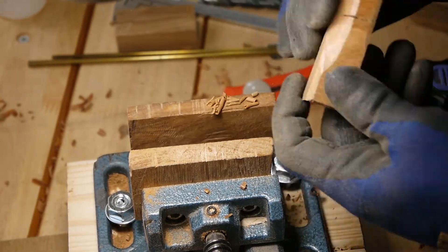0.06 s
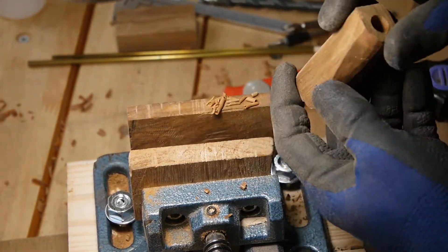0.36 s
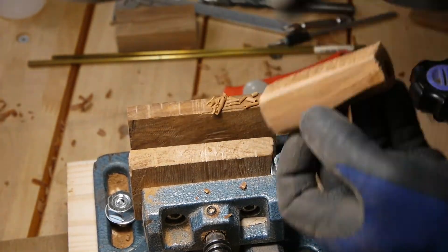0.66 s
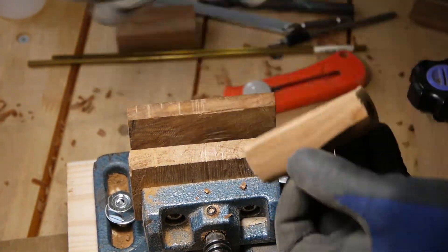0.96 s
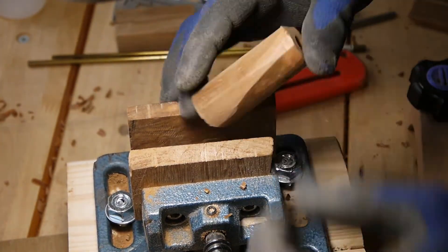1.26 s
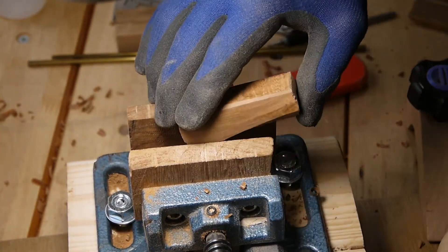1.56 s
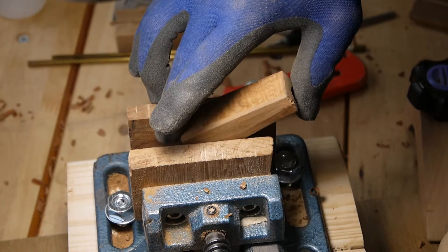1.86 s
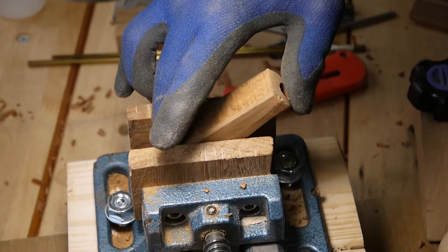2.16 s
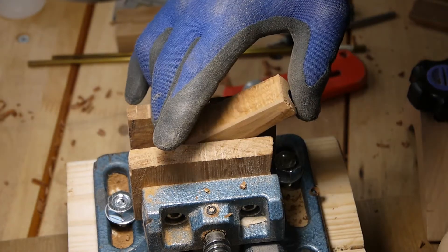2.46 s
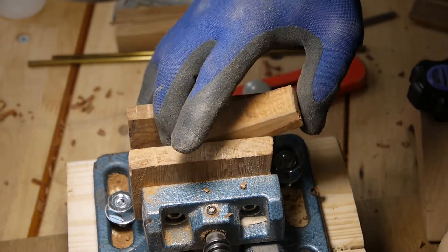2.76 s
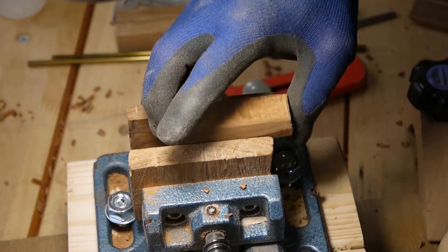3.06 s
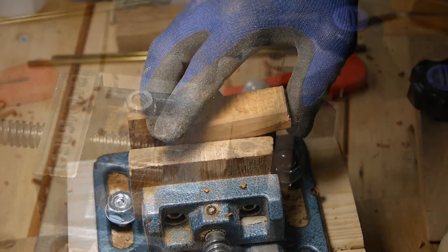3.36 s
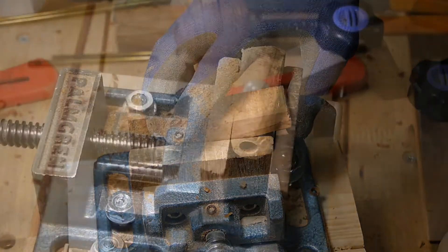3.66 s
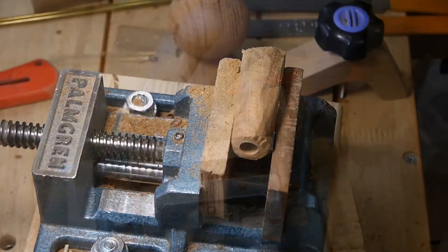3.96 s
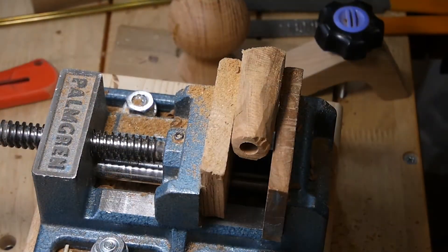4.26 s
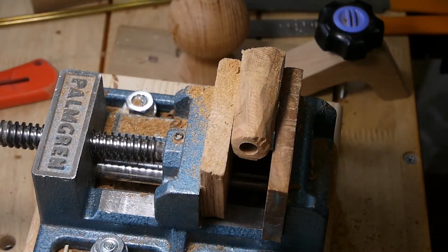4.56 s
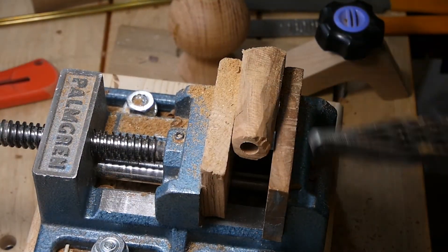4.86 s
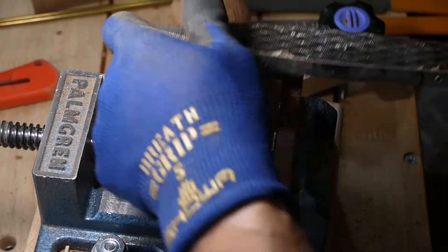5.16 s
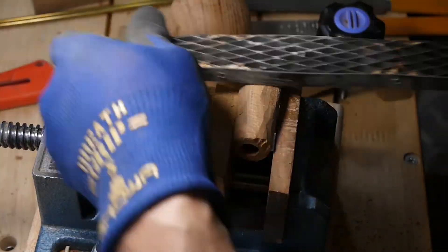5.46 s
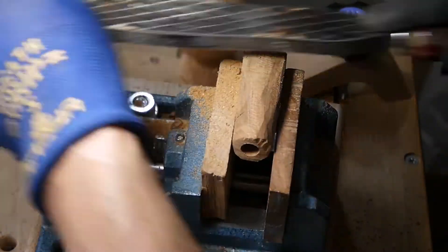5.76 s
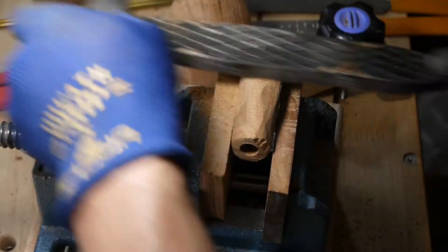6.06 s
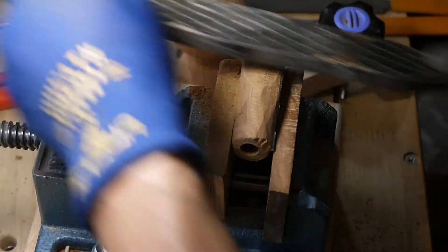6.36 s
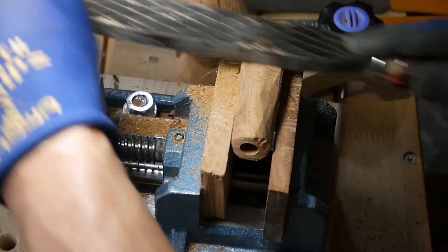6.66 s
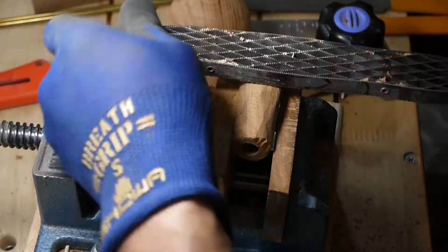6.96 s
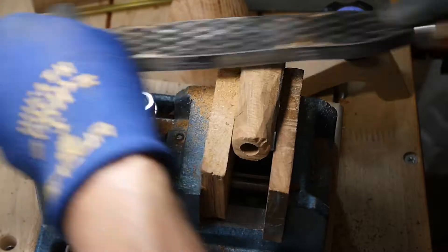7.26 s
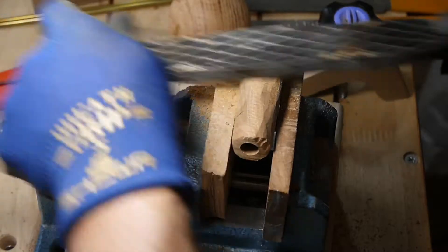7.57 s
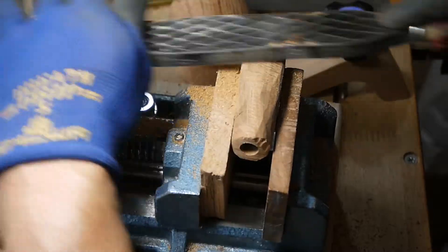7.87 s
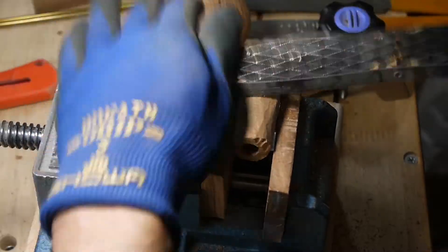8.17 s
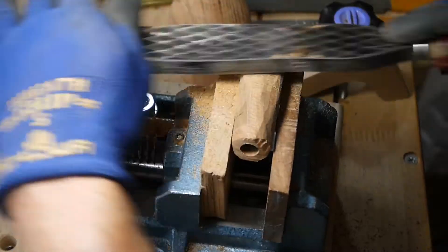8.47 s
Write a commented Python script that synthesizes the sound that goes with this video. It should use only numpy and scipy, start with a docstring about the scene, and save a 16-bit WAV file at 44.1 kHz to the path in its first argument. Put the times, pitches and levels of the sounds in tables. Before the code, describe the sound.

A faint machine hum and a thin, high electrical whine fill a small workshop, and everything is heard close up. At the start, gloves brush softly over a small hardwood block. From about 1 to 2 seconds the block touches the jaws of a steel vice with light clicks and tiny squeaks, and a busier cluster of clicks follows between 2.6 and 3.6 seconds. From 3.8 to 5 seconds come a few dull bumps on the bench, the first with a low boom, among soft glove swishes. At 5.2 seconds a coarse rasp starts filing the clamped wood, much louder, at about five strokes a second. Each stroke lands with a knock, then gives a hollow, gritty scrape with a hiss of tearing fibres and a brief rough note from the blade. The teeth occasionally snag, with a short squeak near 7.9 seconds. The filing continues until the end, around 8.7 seconds.

```python
"""A faint hum and whine fill a workshop. Close up, gloves brush over a small hardwood block and seat it
in a steel vice with light clicks and squeaks. A few dull bumps on the bench follow. Then a coarse rasp
files the clamped wood, five strokes a second: each stroke lands with a knock, tears through the fibres
while the blade sings, and glides back."""
import sys
import numpy as np
from scipy import signal
from scipy.fft import rfft, irfft, next_fast_len
from scipy.io import wavfile
from scipy.ndimage import map_coordinates

SR = 44100
rng = np.random.default_rng(int(sys.argv[2]) if len(sys.argv) > 2 else 0)


def digitize_waveform(pressure):
    """Quantize a signal to 16-bit integers and store it at the path in sys.argv[1].

    Rows of a 2-D input are taken as channels; values are limited to [-1, 1].
    """
    field = np.atleast_2d(pressure).T
    bounded = np.clip(field, -1, 1)
    quanta = np.round(bounded * 32767).astype(np.int16)
    wavfile.write(sys.argv[1], SR, quanta)


N = 383669
SIZE, TOP_HZ = 16384, 15800  # samples in one sound's window; band limit of the mix
T, HZ = np.arange(SIZE) / SR, np.fft.rfftfreq(SIZE, 1 / SR)
MID_S = T[SIZE // 2]  # swells peak here

# room tone colour (frequency [Hz], level [dB])
AIR_BED = [(15, -34), (40, -14), (100, -25.5), (170, -8), (400, -2.5), (600, -5), (1100, -2), (1300, -7),
           (2600, -17.5), (3800, -26), (6500, -30), (10400, -27.5), (12500, -29), (16000, -28)]
# room tone fader (time [s], level [dB])
AIR_LEVEL = [(0.0, -50), (2.56, -52.5), (2.81, -48.5), (3.46, -53.5), (3.82, -52), (3.97, -49.5),
             (4.88, -50.5), (5.2, -49.5)]
# a machine's hum, low drone and electrical whine (frequency [Hz], width [Hz], level [dB])
HUM_MODES = [(608, 9, 12), (854, 11, 6.5), (1101, 17, 3), (1900, 21, -27), (2380, 65, -14.5)]
DRONE_MODES = [(209.7, 2.8, 0)]
WHINE_MODES = [(7640, 51, -14), (8200, 210, -13), (9600, 49, -8), (10370, 550, -10), (10300, 88, -4.5)]
# machine faders (time [s], drone [dB], whine [dB])
MACHINE_LEVEL = [(0, -58, -63.5), (.7, -66, -65.5), (1.1, -72, -68), (3.5, -74, -69), (4, -64.5, -62),
                 (5.199, -65, -61)]
# a motor's steady tones (frequency [Hz], level [dB])
MOTOR_TONES = [(597.5, -58.5), (1087, -60), (10293, -86)]
# gloves brush wood and tools (time [s], half-length [s], level [dB], brightness [dB])
RUBS = [(0.028, 0.039, -41, 13), (0.815, 0.018, -54.5, 29), (0.951, 0.014, -49, 18), (2.594, .01, -51, 1),
        (2.843, .012, -50, -10), (2.878, 0.0052, -49, 11), (3.666, 0.034, -57, 15), (4.065, 0.058, -47, -1),
        (4.219, 0.088, -48.5, -9), (4.394, 0.11, -55, 10), (4.507, 0.018, -53, 12),
        (4.699, 0.029, -41.5, 26), (4.844, 0.03, -49.5, 10), (5.096, 0.031, -46.5, 27)]
# glove colour (frequency [Hz], level [dB])
GLOVE_COLOUR = [(59, -67), (100, -40), (335, -1.5), (836, 6), (1080, -11), (1170, 2), (2040, -3.5),
                (2690, -9), (3620, -14.5), (16000, -27)]
# the block touches the jaws (time [s], level [dB], brightness [dB])
TAPS = [(.945, -43, 13), (1.433, -37, -1), (1.61, -37.5, -40), (1.68, -31, -4), (1.787, -44.5, 10),
        (1.835, -35, -17), (2.124, -31.5, -4), (2.609, -23, 4), (2.638, -33, 6), (2.693, -25.5, 18),
        (2.705, -22, -10), (2.72, -27.5, -21), (2.739, -33.5, 11), (2.783, -37.5, -1), (2.883, -23.5, -9),
        (2.941, -29.5, -18), (3.004, -36, -5), (3.235, -32.5, -3), (3.252, -27.5, -5), (3.55, -37, 1)]
# wood sticks and slips (time [s], half-length [s], pitch [Hz], width [Hz], level [dB])
SQUEAKS = [(.95, .012, 3000, 650, -54), (1.443, 0.014, 2520, 510, -46), (1.686, 0.014, 1946, 130, -43.5),
           (4.175, 0.1, 330, 29.7, -49), (5.103, 0.026, 320, 57, -42), (7.889, 0.013, 1972, 86, -19),
           (8.545, 0.012, 486, 19.6, -29.5)]
# bumps on the bench (time [s], level [dB], brightness [dB], boom [dB])
BUMPS = [(3.799, -12, 5, 6), (3.816, -16, -2, 17), (3.858, -21.5, 8.5, 2), (3.905, -28.5, -16, -24),
         (3.949, -18.5, -20.5, -14), (4.023, -31, 3, -4), (4.359, -23, 9, 5), (4.503, -32, -32, -13),
         (4.673, -14, -13.5, -13), (5.04, -21.5, 2, -7), (5.051, -15.5, -0.5, -20)]
# resonances of the block, the bench and the steel teeth (frequency [Hz], width [Hz], level [dB])
BLOCK_MODES = [(461, 18, 10), (555, 48, 1.5), (686, 99, 2.5), (884, 31, 5.5), (1015, 9.3, 5),
               (1400, 21, -16), (1940, 70, -2.5), (2270, 34, -5), (3320, 70, -14), (3520, 98, -18),
               (3950, 110, -23), (4880, 80, -26), (6420, 120, -19.5), (7350, 320, -26)]
BENCH_MODES = [(244, 30, 2), (468, 11, -16), (600.0, 16, 6.0), (1162, 18, -2), (1450, 46, -27),
               (1710, 52, -11), (2185, 17, -9.0), (4500, 400, -25.5), (5000, 300, -28)]
STEEL_MODES = [(4560, 54, 5.6), (5330, 130, 2.1), (6350, 31, 4.7), (6850, 110, 2.2), (8300, 110, 2),
               (9520, 290, 8.8), (9700, 220, 5.2), (10310, 150, 8.4), (11070, 120, 4.1), (11230, 120, 1.7),
               (13400, 120, 4.2), (15400, 130, 5), (15500, 110, 4.8)]
# resonances of clamped wood and vice (frequency [Hz], width [Hz], scraped [dB], knocked [dB])
CLAMPED_MODES = [(160, 11, -20.5, -29), (246.5, 31, -18.5, -8.5), (339, 55, -20.5, -10),
                 (463, 20, -3.5, 4.5), (550, 35, -10.5, 3.5), (682, 36.7, -6.5, 7.5), (798, 33, -8.5, -1),
                 (849, 39, -13, 0.5), (1013, 62, -11, -8.5), (1182, 44.4, -4, 0), (1391, 51, -11, -15),
                 (1574, 43, -12, -19.5), (1768, 38, -9, -13), (1890, 24.5, -3.5, 0.5),
                 (1968, 37, -12.5, -2), (2095, 35, -9.5, -5), (2285, 47, -8, -3.5), (2520, 95, -15.5, -15),
                 (2940, 25, -19.5, -14), (3146, 42, -19, -25), (3530, 52, -21.5, -32),
                 (3634, 38, -21.5, -28)]
# dense weak modes of block, bench, and clamped wood knocked or scraped (frequency [Hz], level [dB])
BLOCK_BED = [(60, -50), (330, -17), (450, -15), (1000, 0.5), (1300, -7), (2200, -11), (2800, -17),
             (5500, -27.5), (12000, -30.5), (16000, -51)]
BENCH_BED = [(30, -50), (85, -48), (140, -7), (350, -1.5), (650, 0), (1100, -5), (2000, -15), (3400, -29.5),
             (5000, -41), (7000, -35), (10000, -35), (16000, -40)]
KNOCK_BED = [(30, -50), (90, -56), (145, -12), (400, -27.5), (900, -12), (1500, -13.5), (2400, -12.5),
             (3800, -30.5), (7500, -38), (9700, -35), (13000, -41.5), (16000, -43)]
SCRAPE_BED = [(30, -33.5), (90, -56), (135, -18.5), (400, -25.5), (1500, -21), (2200, -47), (2800, -39),
              (4000, -35.5), (6000, -38), (16000, -61)]
# hiss of tearing fibres (frequency [Hz], level [dB])
FIBRE_BED = [(1500, -60), (2800, 2), (4200, -4.5), (5000, -11), (7500, -3), (8400, 0), (10800, 3),
             (11100, -8), (11700, 4), (12500, -2.5), (14500, -1.5), (16000, 0.5)]
# the rasp lands, then is pushed (time [s], knock [dB], knock brightness [dB], rise to full speed [s],
# push length [s], push [dB], hollowness [dB], blade note [dB])
STROKES = [(5.22, -15.5, -10, 0.1, 0.058, -19.5, 2, -26.5), (5.486, -12, 3.5, 0.07, .052, -23.5, 1, -26.5),
           (5.664, -13, -19, 0.074, 0.054, -24, -0.5, -28),
           (5.872, -11.5, -3.5, .066, 0.05, -22, -2.5, -27),
           (6.061, -6.5, 0.5, .064, 0.052, -20.5, 4.5, -34),
           (6.251, -11.5, -22.5, 0.063, 0.052, -19.5, 6, -52),
           (6.443, -6.5, 1.5, 0.055, 0.046, -18, 6.5, -43),
           (6.623, -7.5, -11, 0.063, 0.051, -22, -1, -25.5),
           (6.812, -8.5, -12.5, 0.068, 0.052, -23, -2, -29), (7.003, -3.5, -3, 0.062, 0.052, -21.5, 3, -32),
           (7.185, -8, 11, 0.057, 0.053, -20.5, -5, -26), (7.354, -12.5, -5, 0.067, 0.051, -19, 5.5, -22.5),
           (7.551, -5.5, 9, 0.064, 0.047, -19, 2.5, -22.5), (7.799, -8.5, -9, .1, 0.05, -20, 5, -32),
           (8.009, -16, -6, .076, 0.057, -19.5, 4, -28.5),
           (8.211, -4.5, -3.5, 0.057, 0.053, -18.5, 3.5, -25.5),
           (8.388, -13.5, -18, 0.058, 0.053, -16.5, 7, -38), (8.573, -8.5, 0, .06, 0.053, -18, 0, -28)]
# the teeth bite in after the first strokes (time [s], fibre level [dB])
BITE = [(5.32, -32), (5.74, -32), (6.15, -23.5), (6.7, -26), (7.9, -27.5), (8.08, -28.5), (8.27, -26)]
# the rasp drags on the way back (time [s], wood [dB], fibres [dB])
DRAGS = [(6.421, -43, -51), (7.141, -33.5, -53), (8.183, -58, -46), (8.345, -37.5, -39.5),
         (8.537, -39.5, -48.5)]
# a tooth snags in mid-push (time [s], level [dB], brightness [dB])
SNAGS = [(6.516, -11.5, -15), (6.694, -14, -21), (6.892, -13, -20), (7.88, -10, 16), (7.896, -14.5, 3),
         (7.902, -17, 1), (8.093, -18.5, 8)]
# workshop reverb (frequency [Hz], decay by 60 dB [s])
ROOM_DECAY = [(150, 0.54), (600, 0.18), (2500, 0.068), (12000, 0.1)]
# stereo width of the quiet layers and of the filing (frequency [Hz], side over mid [dB])
QUIET_WIDTH = [(60, -9), (150, -20), (380, -23), (950, -18), (2380, -5), (6000, -3), (15000, -7)]
FILING_WIDTH = [(60, -8), (110, -17), (200, -27), (380, -32), (700, -32), (1290, -20), (2380, -12),
                (4400, -7), (8120, -8), (15000, -8)]
# pan of the filing (frequency [Hz], left over right [dB])
FILING_PAN = [(1000, 0), (1500, 1), (2100, 3.3), (3000, .5), (5000, 1.5), (8500, .7), (9400, 3.8),
              (10800, .3), (16000, .5)]


def amp(db):
    """Decibels to gain."""
    return 10 ** (np.asarray(db) / 20)


def unit(x):
    """Scale to rms 1."""
    return x / np.sqrt(np.mean(x ** 2) + 1e-20)


def burst(x, length):
    """Give a short sound the energy of rms 1 held for length seconds."""
    return x * np.sqrt(length * SR) / np.linalg.norm(x)


def along(points, hz):
    """Read a (frequency [Hz], value) curve on a log axis."""
    freqs, values = np.transpose(points)
    return np.interp(np.log(hz + 1), np.log(freqs + 1), values)


def add(track, s, sound):
    """Mix a sound into a track at time s."""
    start = round(s * SR)
    part = sound[max(-start, 0):N - start]
    track[max(start, 0):][:len(part)] += part


def filtered(x, response):
    """Equalise x with a function of frequency."""
    size = next_fast_len(N + SR // 2)
    return irfft(rfft(x, size) * response(np.fft.rfftfreq(size, 1 / SR)), size)[..., :N]


def body(modes, bed=((1, -120),)):
    """Gain of an object: resonance peaks on a bed of weak, dense modes, silent by default."""
    peaks = sum(amp(db) ** 2 / (1 + ((HZ - hz) / width) ** 2) ** 2 for hz, width, db in modes)
    return np.sqrt(peaks + amp(along(bed, HZ)) ** 2)


def treble(db, corner_hz):
    """Gain of a high shelf."""
    return amp(db * HZ ** 2 / (HZ ** 2 + corner_hz ** 2))


def ring(force, gain):
    """Drive a body with a force; minimum phase, so it rings only after each push."""
    cepstrum = irfft(np.log(np.maximum(gain, 1e-6)))
    cepstrum[1:SIZE // 2] *= 2
    cepstrum[SIZE // 2 + 1:] = 0
    impulse = irfft(np.exp(rfft(cepstrum)))
    return signal.fftconvolve(force, impulse)[:len(force)]


def wander(rate, axis):
    """A smooth random curve with rate knots per unit of the axis."""
    return map_coordinates(rng.standard_normal(int(axis[-1] * rate) + 4), [axis * rate])


def grains(rate, scatter_db):
    """Random tiny snaps of uneven size, rate a second, with rms 1."""
    struck = rng.random(SIZE) < rate / SR
    return unit(struck * rng.choice([-1, 1], SIZE) * amp(scatter_db * rng.standard_normal(SIZE)))


def swell(half_s, shape):
    """Speed of a hand movement, 1 at mid-window; a higher shape flattens the top."""
    return np.exp(-np.abs((T - MID_S) / half_s) ** shape)


def rough_tone(hz, width_hz):
    """Noise squeezed into a resonance that may glide, with rms 1."""
    phase = 2 * np.pi * np.cumsum(hz * np.ones(SIZE)) / SR
    return unit(wander(2 * width_hz, T) * np.cos(phase) + wander(2 * width_hz, T) * np.sin(phase))


def blow(gain, attack, hold_s, t60):
    """One hit: a sharp push, then chatter and echoes off the bench that hold briefly and die."""
    chatter = rng.standard_normal(SIZE) * amp(-60 * np.maximum(T - hold_s, 0) / t60)
    force = chatter / np.linalg.norm(chatter)
    force[0] += attack
    return burst(ring(force, gain), length=.0024)


def rocking(s, db, gap_s, loss_db, count=3):
    """A touch and its ever weaker rebounds at uneven gaps: rows (time [s], level [dB])."""
    gaps = gap_s * rng.uniform(.7, 1.3, count)
    return zip(s + np.cumsum(gaps) - gaps[0], db - loss_db * np.arange(count))


def steady(gain):
    """Continuous noise ringing through a body, with rms 1."""
    return unit(ring(rng.standard_normal(N + SIZE), gain)[SIZE:])


def room_tone(buzz_hz=99.93, hiss_db=-1):
    """Air with a machine's hum, a low drone and a thin whine of mains harmonics and hiss."""
    now = np.arange(N) / SR
    times, drone_db, whine_db = np.transpose(MACHINE_LEVEL)
    drone = amp(np.interp(now, times, drone_db)) * steady(body(DRONE_MODES))
    harmonics = np.exp(2j * np.pi * rng.random(int(TOP_HZ / buzz_hz)))
    cycle = irfft(harmonics, SIZE)
    buzz = unit(cycle[(now * buzz_hz % 1 * SIZE).astype(int)])
    hiss = amp(hiss_db) * rng.standard_normal(N)
    whine = amp(np.interp(now, times, whine_db)) * unit(ring(buzz + hiss, body(WHINE_MODES)))
    air = amp(np.interp(now, *np.transpose(AIR_LEVEL))) * steady(body(HUM_MODES, AIR_BED))
    return air + drone + whine


def motor():
    """A motor's clean tones waver slightly in level and phase."""
    now = np.arange(N) / SR
    knots = np.linspace(0, now[-1], SIZE)
    drift = lambda rate: np.interp(now, knots, wander(rate, knots))
    return sum(amp(db + drift(1.9)) * np.sqrt(2) * np.sin(2 * np.pi * hz * now + .5 * drift(5.13))
               for hz, db in MOTOR_TONES)


def gloves():
    """Rubber and knit brush past in soft, grainy swishes."""
    track = np.zeros(N)
    for s, half_s, db, bright_db in RUBS:
        colour = unit(amp(along(GLOVE_COLOUR, HZ)) * treble(bright_db, corner_hz=2470))
        friction = grains(rate=5000, scatter_db=2) * swell(half_s, shape=6.4)
        add(track, s - MID_S, amp(db) * ring(friction, colour))
    return track


def taps():
    """The hand-held block clicks against the jaws and rocks; edges sound brighter than faces."""
    track = np.zeros(N)
    block = body(BLOCK_MODES, BLOCK_BED)
    for touch, touch_db, bright_db in TAPS:
        colour = block * treble(bright_db, corner_hz=2000)
        for s, db in rocking(touch, touch_db, gap_s=.03, loss_db=14):
            add(track, s, amp(db) * blow(colour, attack=.26, hold_s=.0084, t60=.067))
    return track


def squeaks():
    """Wood sticks and slips for an instant, squeaking or groaning."""
    track = np.zeros(N)
    for s, half_s, hz, width_hz, db in SQUEAKS:
        squeak = rough_tone(hz, width_hz) * swell(half_s, shape=3.9)
        add(track, s - MID_S, amp(db) * burst(squeak, half_s))
    return track


def bumps(boom_hz=145):
    """Dull knocks on the bench, each with small rebounds; a few also have a low boom."""
    track = np.zeros(N)
    bench = body(BENCH_MODES, BENCH_BED)
    boom_band = 1 / (1 + (np.log(HZ / boom_hz + 1e-6) / .7) ** 2)  # lowest modes of the bench top
    for touch, touch_db, bright_db, boom_db in BUMPS:
        colour = bench * treble(bright_db, corner_hz=1630) * amp(boom_db * boom_band)
        for s, db in rocking(touch, touch_db, gap_s=.036, loss_db=15):
            add(track, s, amp(db) * blow(colour, attack=.24, hold_s=.012, t60=.066))
    return track


def landings(tick_db=-37.5):
    """The rasp lands or snags: the wood knocks, and the steel teeth tick however dull the knock."""
    track = np.zeros(N)
    wood = body([(hz, width, db) for hz, width, _, db in CLAMPED_MODES], KNOCK_BED)
    steel = body(STEEL_MODES, FIBRE_BED)
    for s, db, bright_db, *_ in STROKES + SNAGS:
        colour = wood * treble(bright_db, corner_hz=1300)
        add(track, s, amp(db) * blow(colour, attack=.45, hold_s=.0098, t60=.034))
        add(track, s, amp(tick_db) * blow(steel, attack=.16, hold_s=.0057, t60=.084))
    return track


def contact_spot(detune=.011, scatter_db=2.5):
    """Gain of the wood under the teeth: each spot favours other modes and loads them differently."""
    modes = [(hz * (1 + rng.normal(0, detune)), width, db + rng.normal(0, scatter_db))
             for hz, width, db, _ in CLAMPED_MODES]
    return body(modes, SCRAPE_BED)


def scrape(s, length, wood_db, fibre_db, edge_db, hollow_db):
    """Teeth catch the wood in a growl and tear fibres in a shorter hiss: rows (start [s], sound)."""
    growl_lead_s, glide_after_s = .0015, .081  # around full speed at time s
    hollow_hz, hollow_width_hz = 535, 105  # low modes, whose strength depends on where the rasp bears
    grip = amp(.83 * wander(213.5, T))  # rows of teeth grip unevenly
    # the rasp slides back with little weight
    glide = amp(rng.normal(0, .5)) * np.roll(swell(.013, shape=1.2), round(glide_after_s * SR))
    growl_envelope = swell(.75 * length, shape=2.9) + amp(-37) * glide
    hiss_envelope = swell(.62 * length, shape=2.7) + amp(-25) * glide
    catches = grains(rate=1800, scatter_db=3) * grip * growl_envelope
    splinters = amp(.68 * wander(125, T))  # fibres give way in bundles
    tears = grains(rate=16000, scatter_db=2.5) * splinters * grip * hiss_envelope
    hollow = amp(hollow_db / (1 + ((HZ - hollow_hz) / hollow_width_hz) ** 4))
    colour = treble(edge_db, corner_hz=3130) * hollow
    slid = .5 + .5 * np.tanh(2 * (T - MID_S) / length)  # crossfade from one spot to the next
    growl = sum(ring(catches * share, contact_spot() * colour) for share in (1 - slid, slid))
    hiss = ring(tears, unit(body(STEEL_MODES, FIBRE_BED)))
    start = s - MID_S
    return [(start - growl_lead_s, amp(wood_db) * burst(growl, length)), (start, amp(fibre_db) * hiss)]


def blade_note(centre_hz=1985, fall_s=.03275, length=.053):
    """The blade sings a rough note that falls as the contact slides along it."""
    bend_hz = rng.uniform(0, 240)
    pitch_hz = centre_hz - bend_hz * np.tanh((T - MID_S) / fall_s) + 110 * wander(34.83, T)
    note = rough_tone(pitch_hz, width_hz=180) * swell(.59 * length, shape=1.86)
    return burst(note, length)


def rasp(usual_push_db=-20.5, note_lead_s=.007):
    """Each push scrapes the wood and makes the blade sing; now and then the teeth drag going back."""
    track, sounds = np.zeros(N), []
    for lands, _, _, rise_s, length, push_db, hollow_db, note_db in STROKES:
        s = lands + rise_s
        edge_db = 3 + 2.5 * (push_db - usual_push_db)  # a harder push growls brighter
        fibre_db = np.interp(s, *np.transpose(BITE))
        sounds += scrape(s, length, push_db, fibre_db, edge_db, hollow_db)
        sounds.append((s - note_lead_s - MID_S, amp(note_db) * blade_note()))
    for s, wood_db, fibre_db in DRAGS:
        sounds += scrape(s, .021, wood_db, fibre_db, edge_db=-44, hollow_db=-2)
    for start, sound in sounds:
        add(track, start, sound)
    return track


def reverb(x, predelay_s=.012):
    """The workshop's short tail; the treble dies first."""
    hz, t, noise = signal.stft(rng.standard_normal(SR // 2), SR, nperseg=256)
    decay = amp(-60 * t / along(ROOM_DECAY, hz)[:, None])
    tail = signal.istft(noise * decay, SR, nperseg=256)[1]
    impulse = np.pad(tail / np.linalg.norm(tail), (round(predelay_s * SR), 0))
    return signal.fftconvolve(x, impulse)[:N]


def spread(x, width):
    """Near surfaces scramble the phase between the channels in the treble; the bass stays central."""
    turn = lambda hz: 2.5 * wander(1 / 30, hz) * hz ** 2 / (hz ** 2 + 1500 ** 2)
    side = filtered(x, lambda hz: 1j * amp(along(width, hz)) * np.exp(1j * turn(hz)))
    return np.array([x + side, x - side])


def scene():
    """Room tone and quiet handling in the centre, then the filing, a little to the left."""
    handling = taps() + bumps() + gloves() + squeaks()
    filing = rasp() + landings()
    filing = spread(filing + amp(-14) * reverb(filing), FILING_WIDTH)
    filing = filtered(filing, lambda hz: amp(np.outer([.5, -.5], along(FILING_PAN, hz))))
    quiet = handling + amp(-13) * reverb(handling) + room_tone() + motor()
    return filing + spread(quiet, QUIET_WIDTH)


def record(dry):
    """A brick-wall high cut; the converter rests slightly below zero."""
    offset = -.003
    return filtered(dry, lambda hz: hz <= TOP_HZ) + offset


dry = scene()
out = record(dry)
digitize_waveform(out)
```